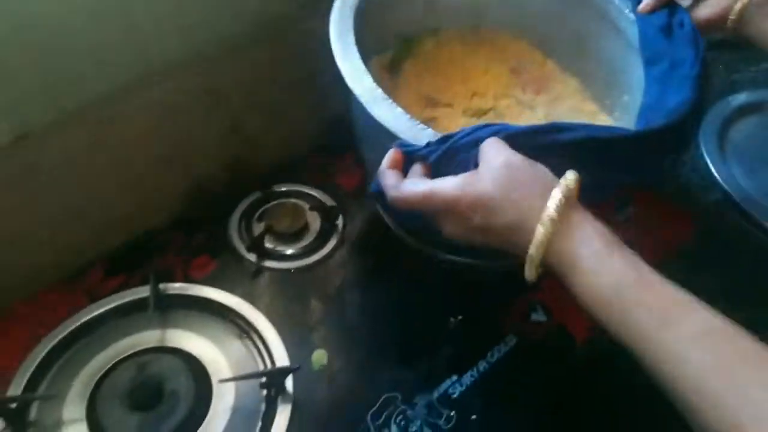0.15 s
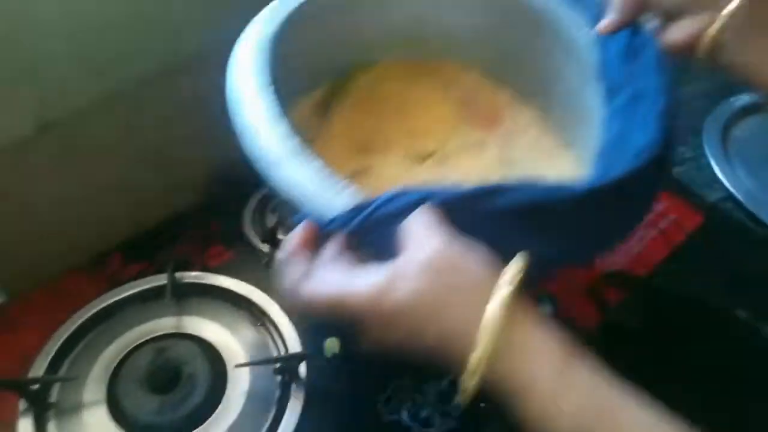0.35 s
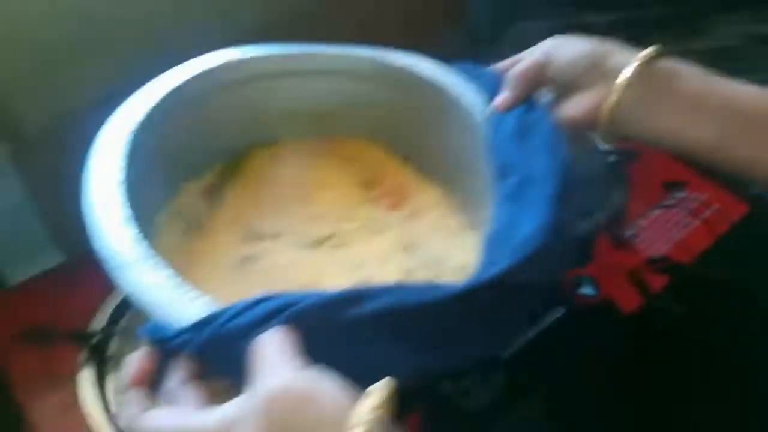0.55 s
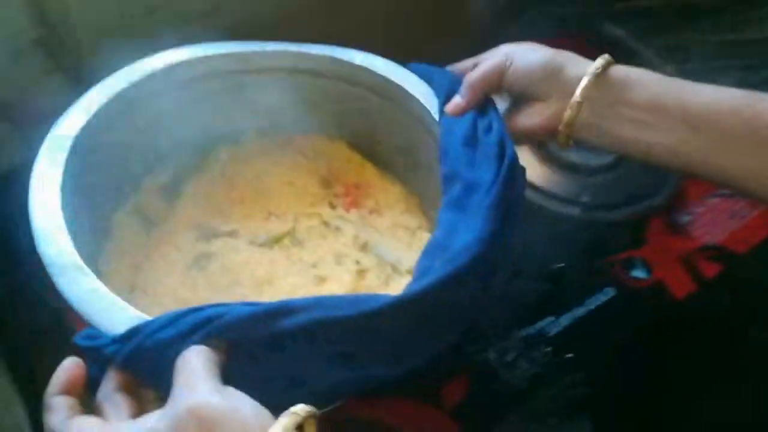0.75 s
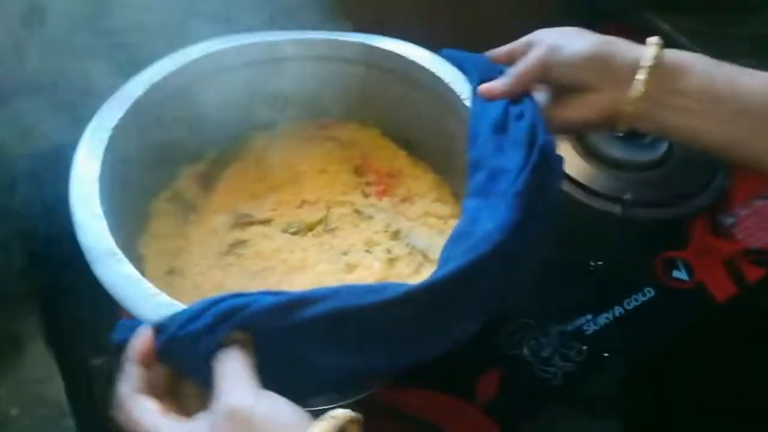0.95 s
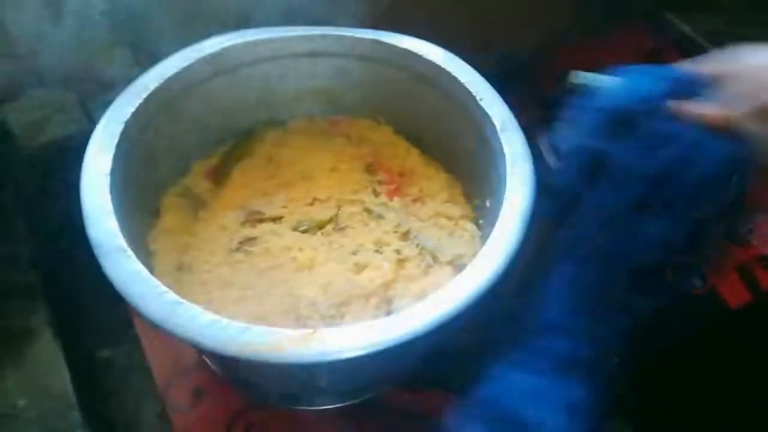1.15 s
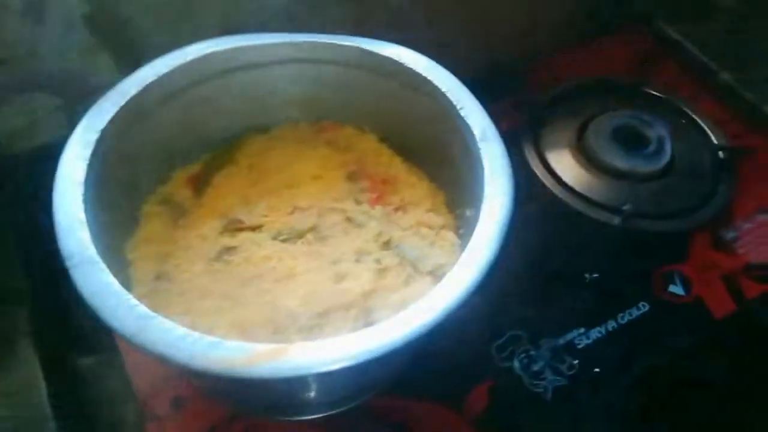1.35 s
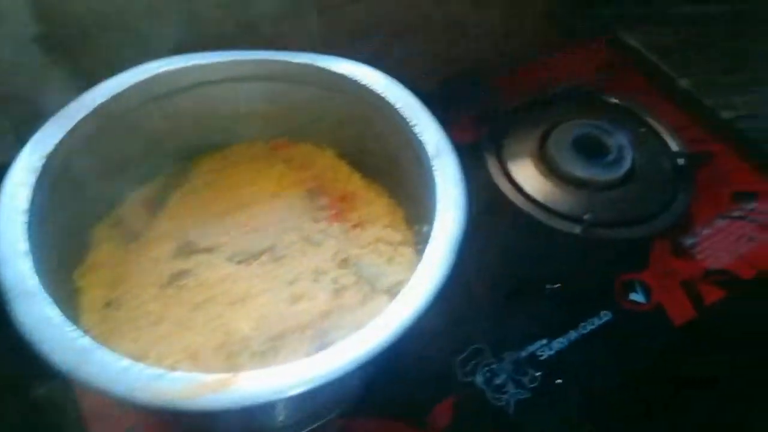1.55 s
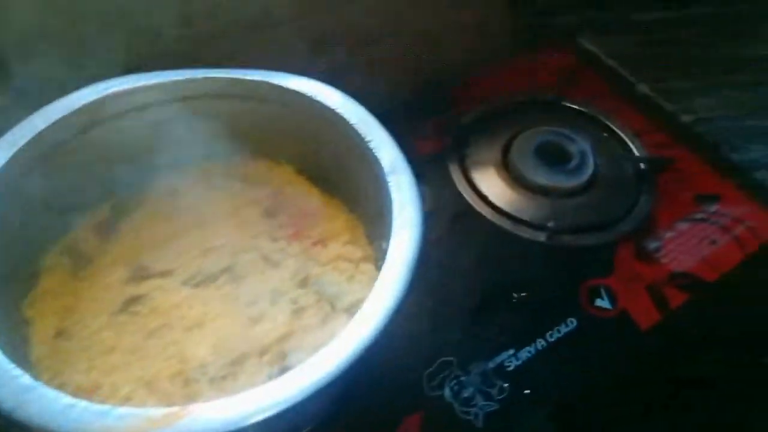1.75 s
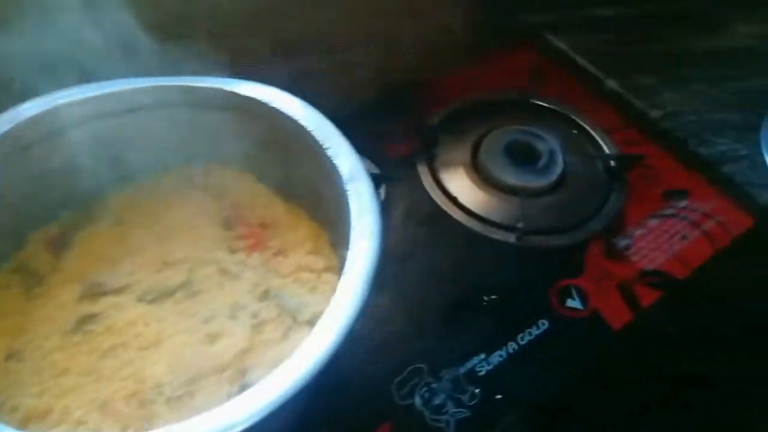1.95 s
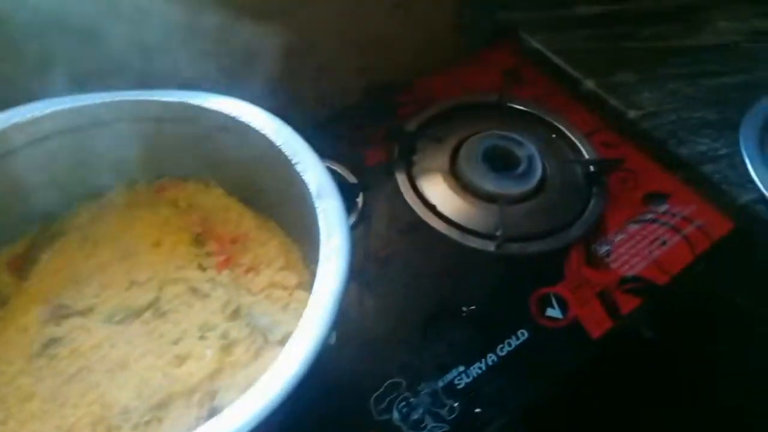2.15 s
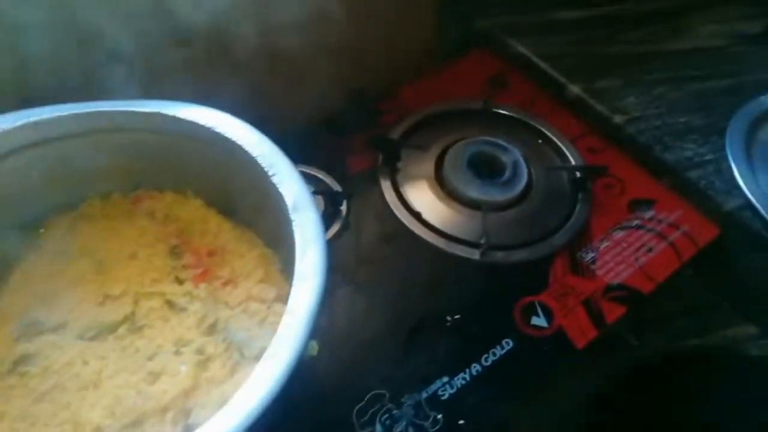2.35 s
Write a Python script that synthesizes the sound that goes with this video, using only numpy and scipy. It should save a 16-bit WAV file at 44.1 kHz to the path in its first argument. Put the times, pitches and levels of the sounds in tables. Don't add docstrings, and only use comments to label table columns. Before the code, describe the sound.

A full metal pot lands hard on a burner grate at 0.23 seconds, with rapid clanging blows until 0.32, rocks back at 0.43 and settles near 0.6, rattling the stove top. Fan hum and airy noise continue. From 1.66 to 2.07 a heavy iron pan scrapes off a grate, ringing brightly at catches near 1.75 and 1.83. Soft knocks follow until 2.3; the small kitchen echoes and loud peaks distort.

```python
import sys
import numpy as np
from scipy import signal
from scipy.io import wavfile

SR = 44100
rng = np.random.default_rng(int(sys.argv[2]) if len(sys.argv) > 2 else 0)


def ratio_of_db(decibels):
    return 10 ** (np.asarray(decibels, float) / 20)


def store_wav(level_fs):
    pcm = np.round(np.clip(np.atleast_2d(level_fs), -1, 1) * 32767)
    wavfile.write(sys.argv[1], SR, pcm.T.astype(np.int16))


N = 110250


def rms_one(x):
    return x / np.sqrt(np.mean(x ** 2) + 1e-20)


def at_hz(points, hz):
    table_hz, value = np.transpose(points)
    return np.interp(np.log(hz), np.log(table_hz), value)


def drift(rate_hz):
    r = np.exp(-80 * np.pi * rate_hz / SR)
    noise = rng.standard_normal(N // 40 + 2002)
    slow = signal.lfilter([1], [1, -2 * r, r * r], noise)[2000:]
    return np.interp(np.arange(N) / 40, np.arange(len(slow)), rms_one(slow - slow.mean()))


def ring(force, hz, t60_s):
    r = ratio_of_db(-60 / (t60_s * SR))
    w = 2 * np.pi * hz / SR
    return signal.lfilter([0, np.sin(w)], [1, -2 * r * np.cos(w), r * r], force + 1e-18)


def width_to_t60(width_hz):
    return np.log(1000) / np.pi / width_hz


def bands(size, gain):
    # f/Hz, correlation
    likeness = [(60, 0.76), (180, 1), (540, 0.35), (1630, 0.25), (4900, -0.027), (14700, -0.07)]
    edges_hz = 20 * 2 ** np.arange(0, 9.7, 1 / 3)
    white = rng.standard_normal((2, 2, size + 4000))
    out = 0
    for k, (low, high) in enumerate(zip(edges_hz, edges_hz[1:])):
        sos = signal.butter(2, [low, high], "band", fs=SR, output="sos")
        mid, side = signal.sosfilt(sos, white[k % 2])[:, 4000:]
        hz = np.sqrt(low * high)
        alike = np.clip(at_hz(likeness, hz), -1, 1)
        stereo = np.sqrt(1 + alike) * mid + np.sqrt(1 - alike) * side * [[1], [-1]]
        out = out + gain(hz) * stereo
    return out


def dying(colour_db, t60_s, length_s):
    t = np.arange(int(length_s * SR)) / SR
    tail = bands(len(t), lambda hz: ratio_of_db(colour_db(hz) - 60 * t / t60_s(hz)))
    return tail / np.sqrt(np.sum(tail ** 2) / 2)


def grains(per_s, spread_db):
    sizes = ratio_of_db(spread_db * np.minimum(rng.exponential(1, N), 4)) * rng.choice([-1, 1], N)
    return rms_one(sizes * (rng.random(N) < per_s / SR))


def through(x, response):
    return signal.fftconvolve(x[None], response, axes=1)[:, :N]


def scattered(force, colour, t60_s, count):
    spot = rng.integers(0, count, N)
    out = 0
    for k in range(count):
        response = dying(lambda hz: at_hz(colour, hz), lambda hz: t60_s, length_s=.12)
        out = out + through(force * (spot == k), response)
    return out


def struck(force, modes):
    lag_s = rng.uniform(-1.27, 1, len(modes)) * 0.00046
    out = np.zeros((2, N))
    for (hz, db, t60_s), lag in zip(modes, (lag_s * SR).astype(int)):
        tone = ratio_of_db(db) * ring(force, hz, t60_s)
        out += np.array([tone, np.roll(tone, lag * (hz > 300))])
    return out


def fan():
    # multiple of shaft rate, level/dB
    orders = [(1, -14.5), (2, 0), (5, -14), (6, -18), (9, -26), (10, -23.5)]
    # t/s, level/dB
    load = [(0.0, -28.5), (0.31, -26), (0.35, -42), (0.56, -22), (0.71, -28.5), (1.27, -31.5), (1.33, -27),
            (1.37, -31.5), (1.91, -27.5), (2.04, -38), (2.08, -28.5), (2.5, -31.5)]
    # f/Hz, width/Hz, level/dB
    housing = [(104.4, 25, -40.5), (116.7, 18, -35), (1356, 8.3, -47.5), (1314, 69, -48)]
    # f/Hz, level/dB per Hz
    air_colour = [(12, -47), (20, -40.5), (100, -9), (156, -14), (272, -9.5), (529, -20.5), (1360, -17),
                  (6610, -30.5), (15200, -49)]
    # f/Hz, left minus right/dB
    air_side = [(60, -1), (180, -2), (540, 2), (1630, -3.5), (4900, -5.5), (14700, 1.5)]
    motor_hz, wander, wobble_db, air_db = 45.78, .008, 2, -34.5

    turn_rad = 2 * np.pi * np.cumsum(motor_hz * (1 + wander * drift(3))) / SR
    load_db = np.interp(np.arange(N) / SR, *np.transpose(load))
    hum = np.zeros(N)
    for k, db in orders:
        level = np.sqrt(2) * ratio_of_db(load_db + db + wobble_db * drift(7.6))
        hum += level * np.sin(k * turn_rad + rng.uniform(0, 5.4))
    for hz, width_hz, db in housing:
        hum += ratio_of_db(db) * rms_one(ring(rng.standard_normal(N), hz, width_to_t60(width_hz)))

    def air_gain(hz):
        balance_db = at_hz(air_side, hz) / 2 * np.array([[1], [-1]])
        return ratio_of_db(at_hz(air_colour, hz) + 1.5 * drift(5.8) + balance_db)

    return hum + ratio_of_db(air_db) * rms_one(bands(N, air_gain))


def touches():
    # t/s, peak/dB, f/Hz, t60/s
    contacts = [
        (0.5939, -12.5, 480, 0.021),
        (1.5452, -33, 1077, .12),
        (1.5725, -18, 5400, 0.0012),
        (2.0349, -25.5, 156, 0.156),
        (2.0974, -21.5, 228.6, 0.078),
        (2.1129, -28.5, 160, 0.097),
        (2.2701, -23.5, 257, 0.048),
        (2.3243, -19, 3704, 0.0012),
    ]
    out = np.zeros(N)
    for s, db, hz, t60_s in contacts:
        click = 1. * (np.arange(N) == int(s * SR))
        out += ratio_of_db(db) * ring(click, hz, t60_s)
    return out


def pan():
    # t/s, level/dB
    drag = [(1.66, -41), (1.68, -29), (1.696, -21.5), (1.74, -27.5), (1.81, -27), (1.878, -21.5),
            (1.972, -26.5), (2.03, -31), (2.075, -60)]
    # t/s, peak/dB, favoured mode/Hz, its gain/dB
    catches = [
        (1.69, -18, 3500, 0),
        (1.748, -6, 1665, 16),
        (1.825, -6.5, 4850, 4.5),
        (1.872, -14.5, 4800, 10),
        (2.0, -17.5, 1240, 15.5),
    ]
    # f/Hz, width/Hz, level/dB
    low_modes = [(915, 36, -16), (1239, 53, -8), (1665, 40, -6), (2210, 57, -8.5), (2788, 46, -4),
                 (3124, 21, -2.5), (3440, 59, 1.5), (3600, 51, 1), (3748, 41, 2), (4250, 72, -6.5),
                 (4700, 19, -6.5), (4800, 46, -1)]
    # f/Hz, width/Hz, level/dB
    high_modes = [(5830, 69, 1.5), (6700, 27, -1), (7020, 28, 1), (7320, 20, 2), (8500, 71, -3),
                  (8820, 68, -1.5), (9660, 100, -1), (10500, 59, -11), (11240, 110, -4), (11600, 75, -51),
                  (12600, 39, -32), (12700, 120, -18), (13300, 40, -17), (13900, 88, -16)]
    # f/Hz, level/dB per Hz
    grit = [(500, -29), (900, -28), (1500, -14), (2200, -12), (3500, 0), (5000, -8), (8500, -8),
            (15000, -20)]
    high_db, slip_db, grit_db, thud_db, side_db = -6, -8, -4, -29.5, -2
    skid_db, catch_db, skid_t60_s = -13, 13.5, 0.21
    ring_scale, favour_octaves, lag_s = 1.1, .12, .0006

    t = np.arange(N) / SR
    drag_s, drag_db = np.transpose(drag)
    press = ratio_of_db(np.interp(t, drag_s, drag_db, left=-90, right=-90))
    slips = grains(3000, spread_db=3.0)
    dragging = press * slips
    skids = []
    for s, db, _, _ in catches:
        decay = (t >= s) * ratio_of_db(db - 60 * np.abs(t - s) / skid_t60_s)
        click = np.arange(N) == int(s * SR) + 1
        skids.append(decay * (ratio_of_db(skid_db) * slips + ratio_of_db(catch_db) * click))

    out = np.zeros((2, N))
    modes = list(low_modes) + [(hz, width_hz, db + high_db) for hz, width_hz, db in high_modes]
    for hz, width_hz, db in modes:
        t60_s = ring_scale * width_to_t60(width_hz)
        gains = []
        for _, _, best_hz, gain_db in catches:
            closeness = np.exp(-(np.log2(hz / best_hz) / favour_octaves) ** 2)
            gains.append(ratio_of_db(gain_db * closeness))
        force = (dragging + np.dot(gains, skids)) / np.sqrt(t60_s * SR / 28)
        for side in out:
            share = force * ratio_of_db(3.0 * drift(8.5))
            tone = ring(share, hz * rng.normal(1, 0.0013), t60_s)
            side += ratio_of_db(db + slip_db) * tone * rng.choice([-1, 1])
    out += ratio_of_db(grit_db) * scattered(dragging + sum(skids), grit, 0.024, count=4)
    out += ratio_of_db(thud_db) * ring(skids[1], hz=280, t60_s=0.074)
    late = np.interp(t - lag_s, t, out[1])
    return np.array([out[0] * ratio_of_db(side_db), late / ratio_of_db(side_db)])


def pot():
    # t/s, peak/dB, rattle t60/s
    blows = [
        (.234, 0.5, 0.19),
        (.245, 3.5, 0.18),
        (.27, -2.5, 0.26),
        (.293, 2, 0.12),
        (.316, -4, 0.27),
        (.433, 1.5, 0.12),
        (.45, -7.5, 0.31),
        (.588, -20, 0.14),
    ]
    # f/Hz, level/dB, t60/s
    landing_modes = [(101, -3, 0.15), (231, 0.5, 0.31), (325, 2, 0.25), (400.4, -3, 0.3), (473, 6, 0.18),
                     (557, -6, 0.24), (723.5, 3, .11), (883, 7, .09), (1050, -15, 0.078),
                     (1290, -12, 0.089), (1680, -7, 0.14)]
    # f/Hz, level/dB, t60/s
    seated_modes = [(90.6, -7, 1), (166, -3, 0.23), (245, 5.5, 0.13), (332, -11.5, 0.15), (590, -3, .07),
                    (927, -6, 0.05), (1060, -2, .05), (1120, -7, 0.072), (1530, -7, .04), (1850, -5, 0.027),
                    (3140, 0, 0.075)]
    # f/Hz, level/dB per Hz
    clatter = [(60, -43), (230, -9), (450, -4), (900, -7.5), (2100, -17), (3300, -13), (6000, -23.5),
               (15000, -53)]
    tick_db, rattle_db, landing_db, seated_db, clatter_db = -2, -30, -20.5, -15, 18

    t = np.arange(N) / SR
    rattle = grains(4400, spread_db=5.0)
    force = np.zeros(N)
    for s, db, t60_s in blows:
        force[int(s * SR)] += ratio_of_db(db + tick_db)
        force += (t > s) * ratio_of_db(db + rattle_db - 60 * np.abs(t - s) / t60_s) * rattle
    seated = t > .4
    tone = ratio_of_db(landing_db) * struck(force * ~seated, landing_modes)
    tone += ratio_of_db(seated_db) * struck(force * seated, seated_modes)
    return tone + ratio_of_db(clatter_db) * scattered(force, clatter, 0.058, count=5)


def scene():
    # f/Hz, t60/s
    kitchen = [(100, 0.42), (500, 0.49), (2000, 0.65), (6000, 0.74), (14000, 0.3)]
    stove_room_db, pan_room_db, predelay_s = -8, -12, .004
    air = fan()
    stove, iron = touches() + pot(), pan()
    room = dying(lambda hz: 0, lambda hz: at_hz(kitchen, hz), length_s=.7)
    sent = ratio_of_db(stove_room_db) * stove + ratio_of_db(pan_room_db) * iron
    late = np.roll(sent.mean(axis=0), int(predelay_s * SR))
    return stove + iron + through(late, room) + air


def top_cut(x):
    return signal.sosfilt(signal.butter(12, 15340, fs=SR, output="sos"), x)


def record(dry):
    rumble_cut = signal.butter(2, 42, "high", fs=SR, output="sos")
    mix = np.clip(signal.sosfilt(rumble_cut, dry), -1, 1)
    return top_cut(mix)


dry = scene()
out = record(dry)
store_wav(out)
```